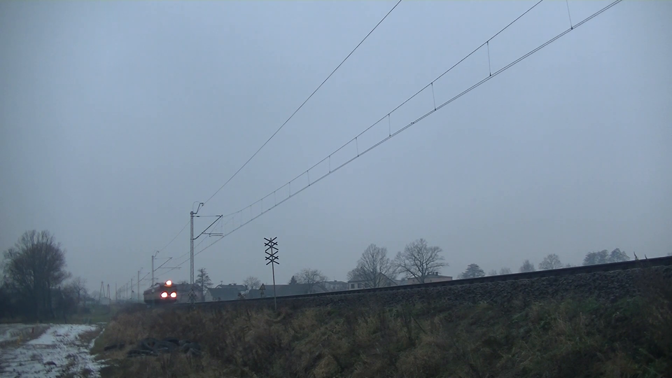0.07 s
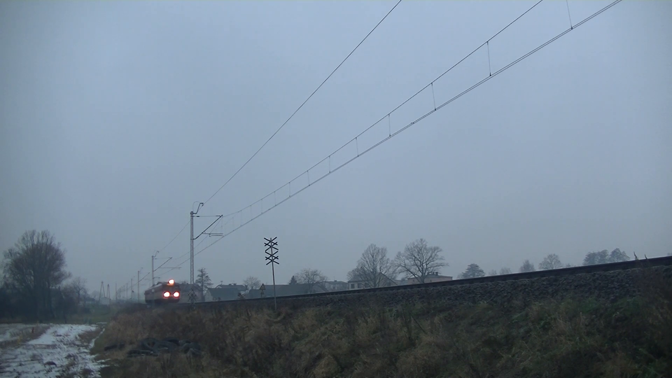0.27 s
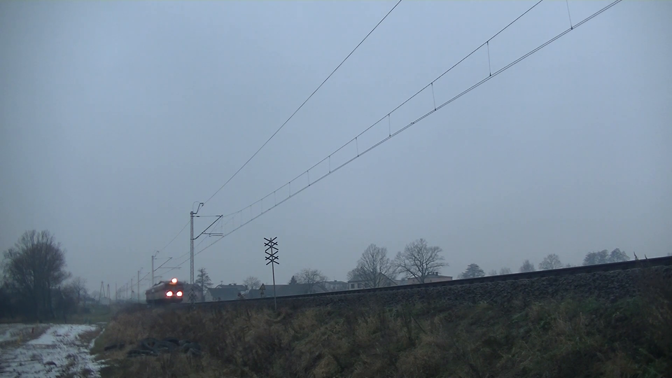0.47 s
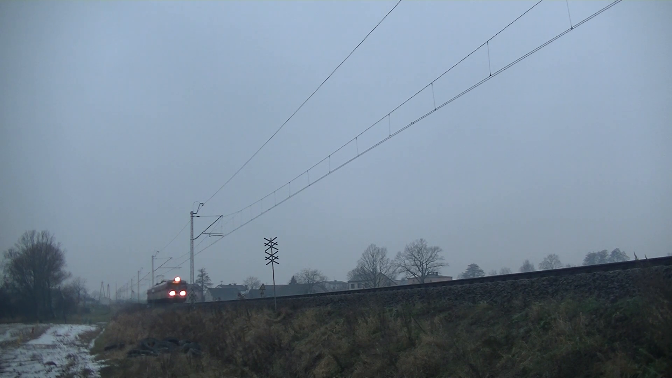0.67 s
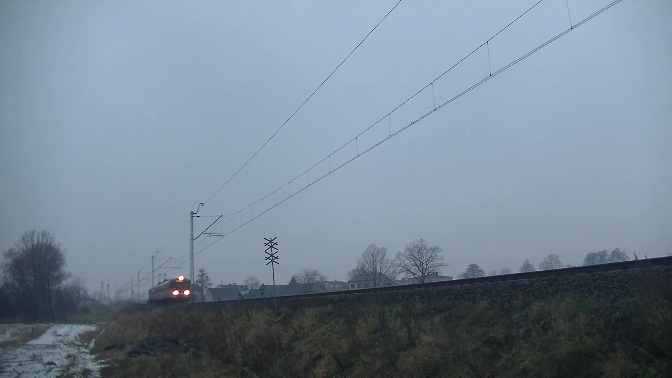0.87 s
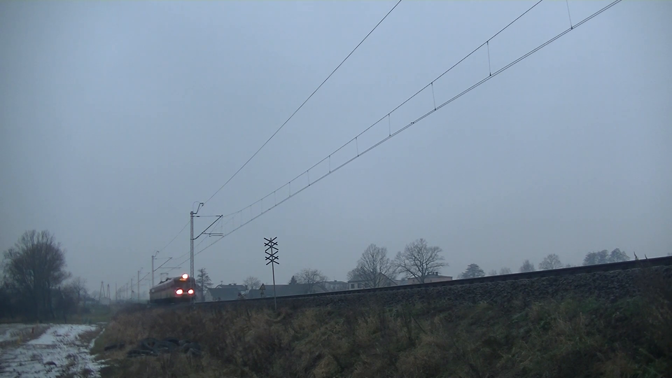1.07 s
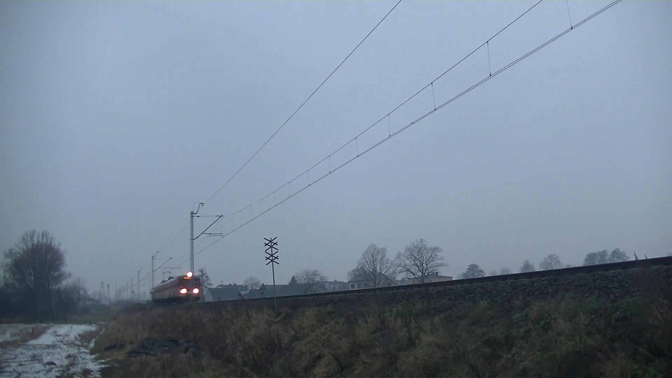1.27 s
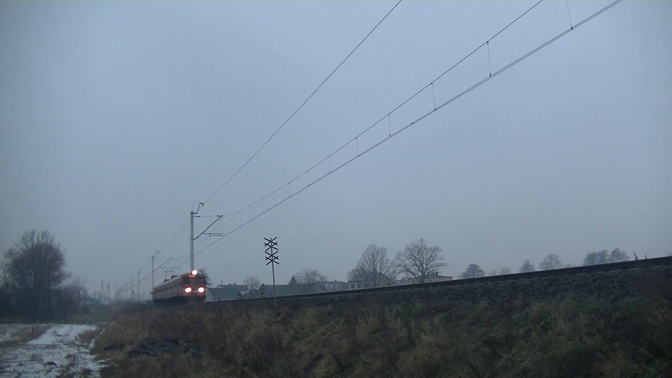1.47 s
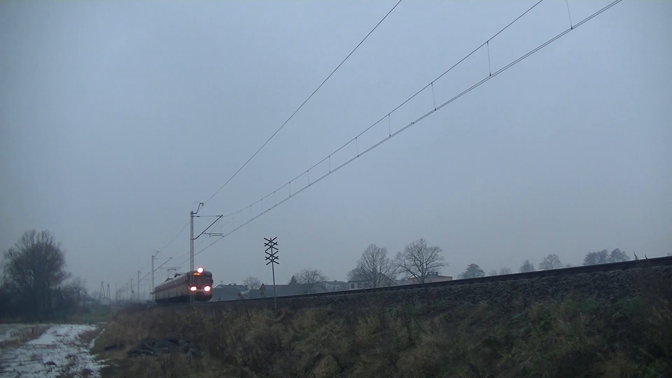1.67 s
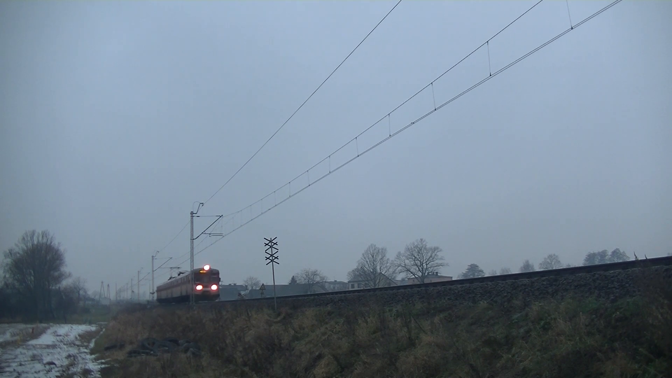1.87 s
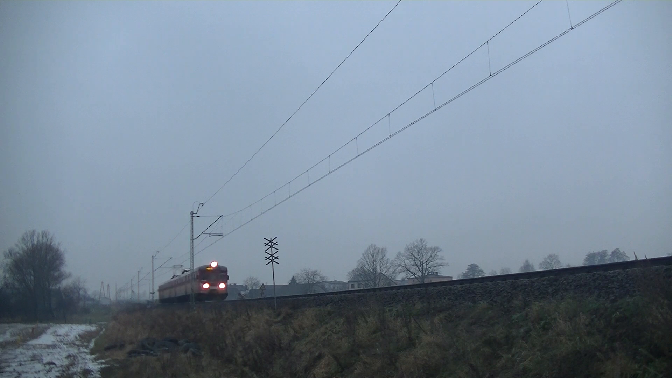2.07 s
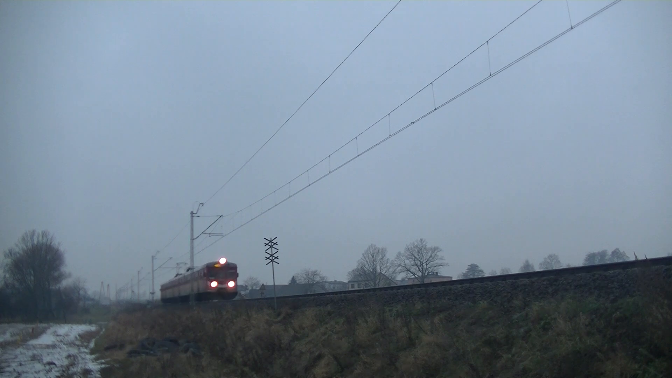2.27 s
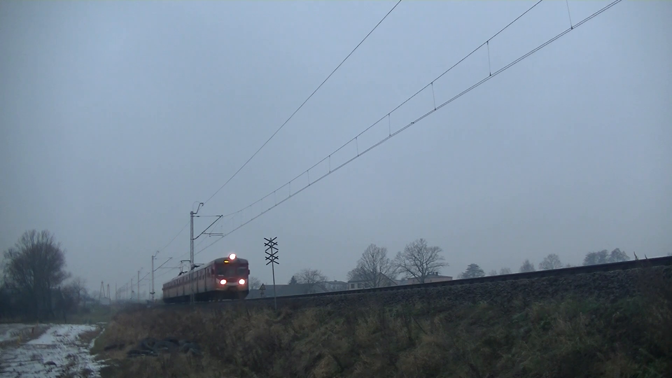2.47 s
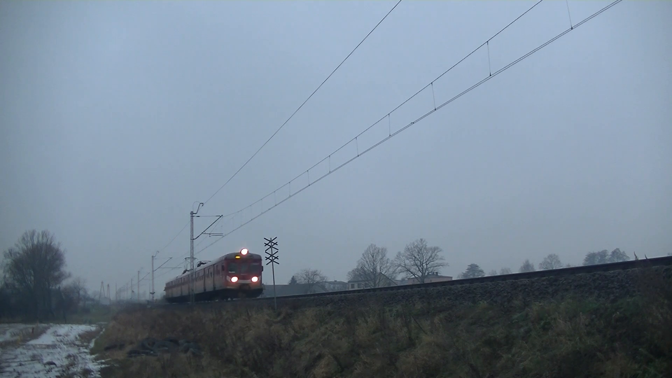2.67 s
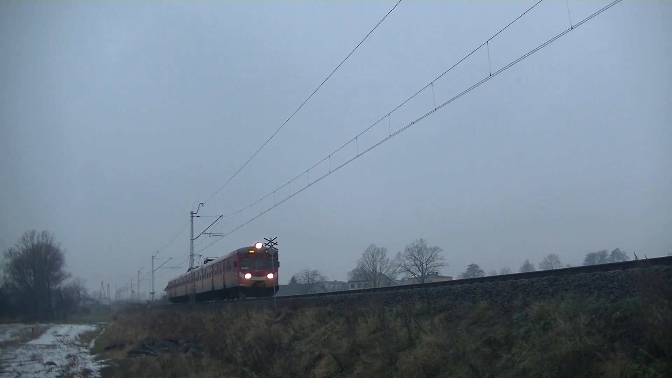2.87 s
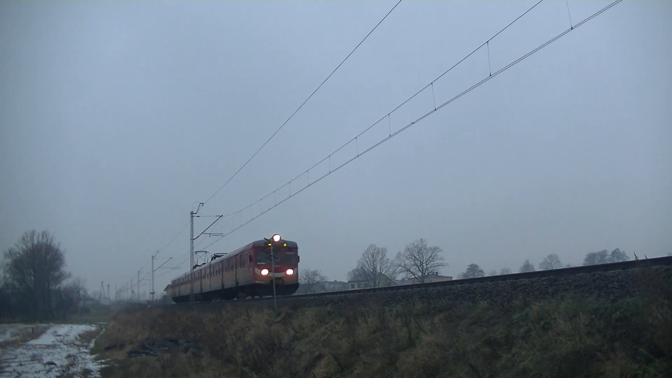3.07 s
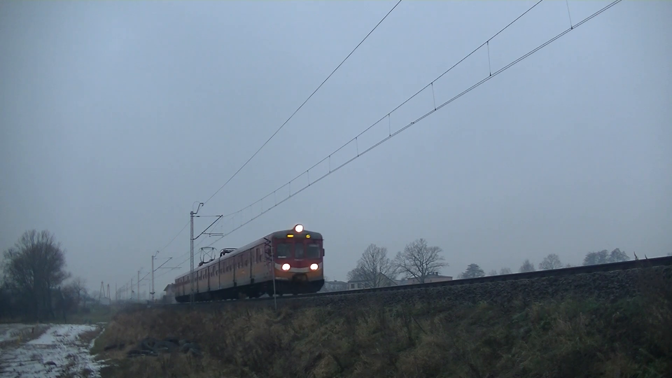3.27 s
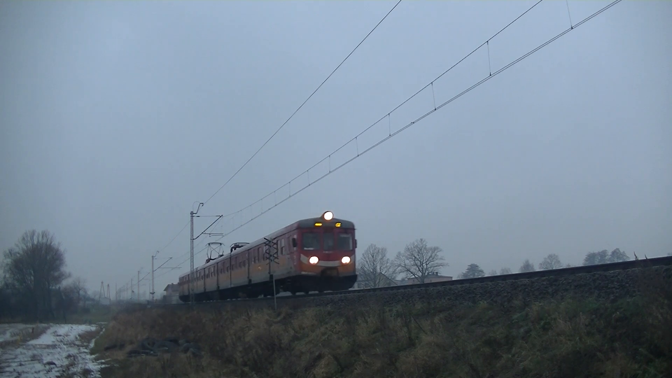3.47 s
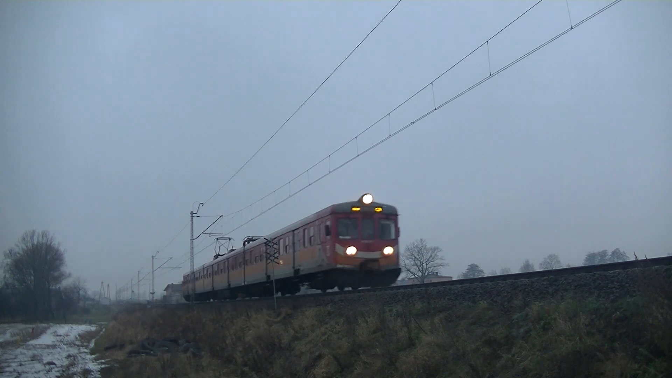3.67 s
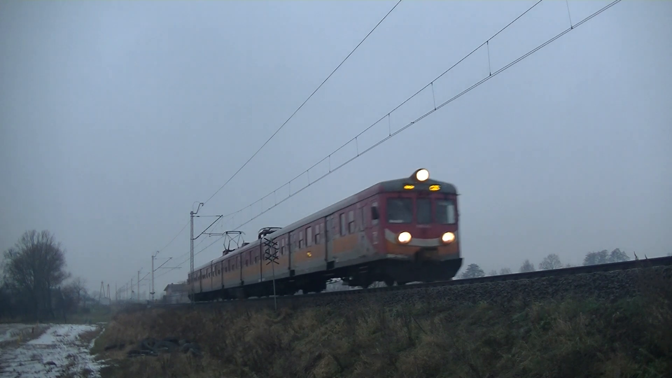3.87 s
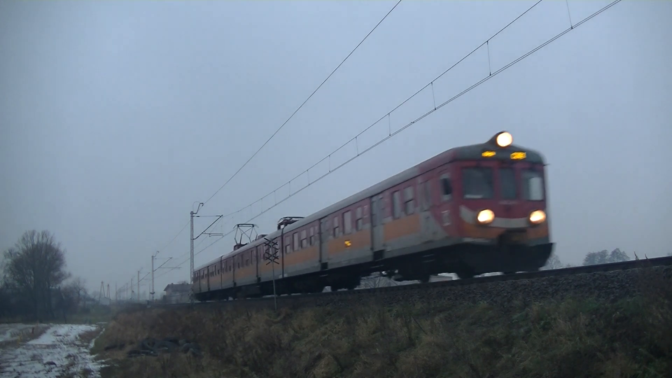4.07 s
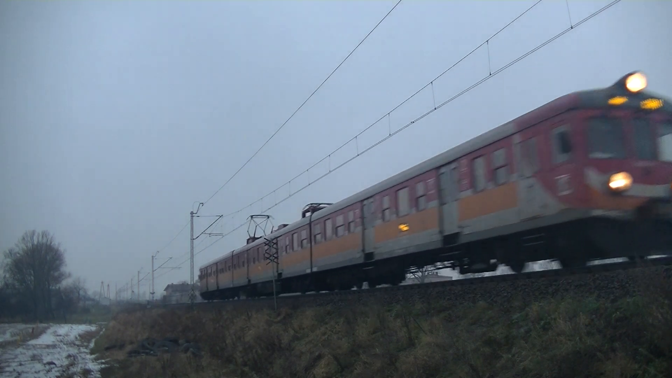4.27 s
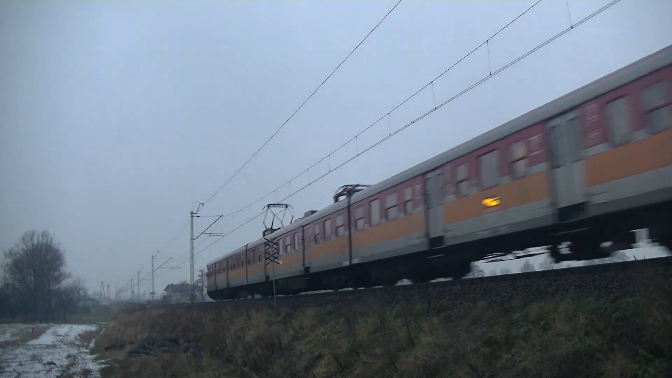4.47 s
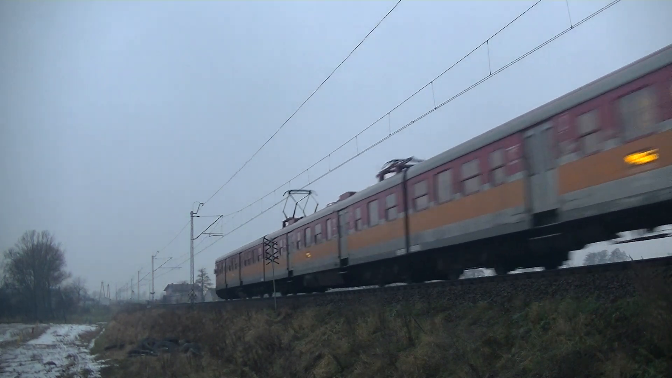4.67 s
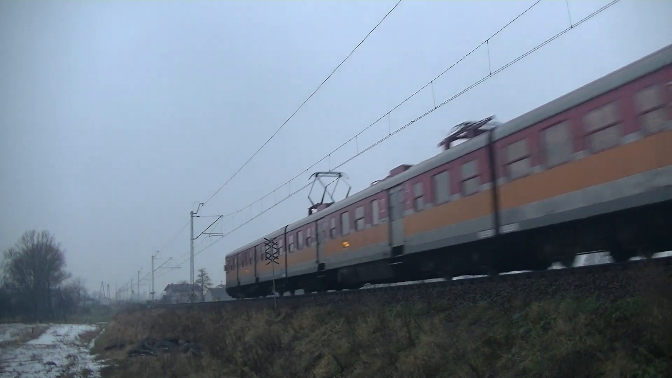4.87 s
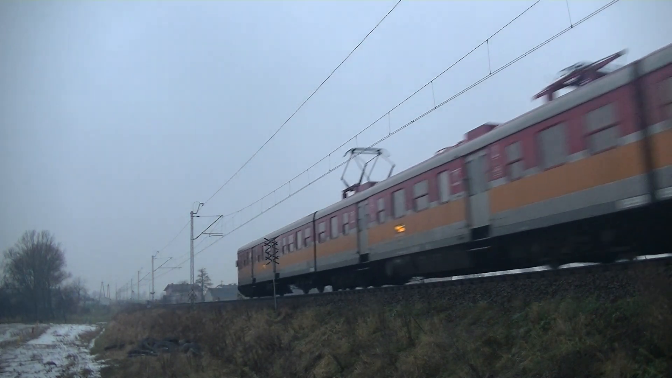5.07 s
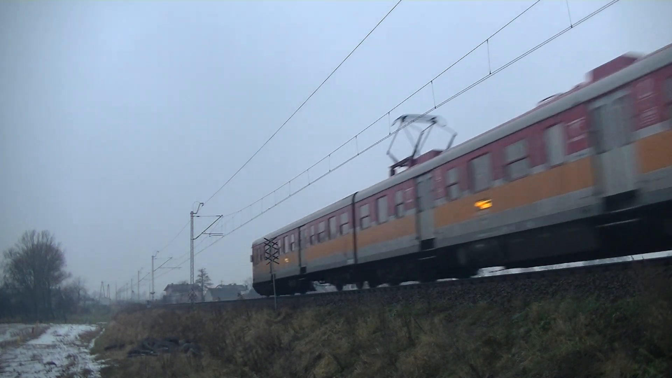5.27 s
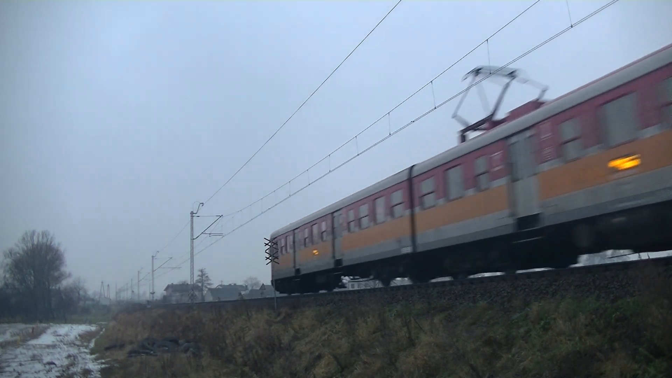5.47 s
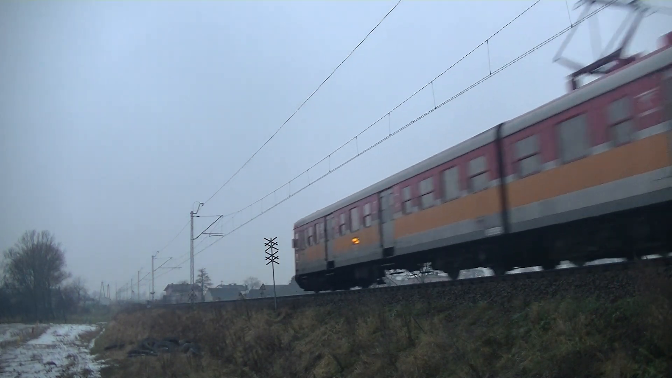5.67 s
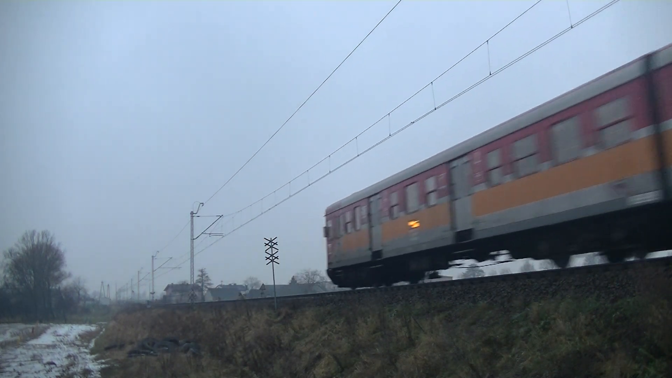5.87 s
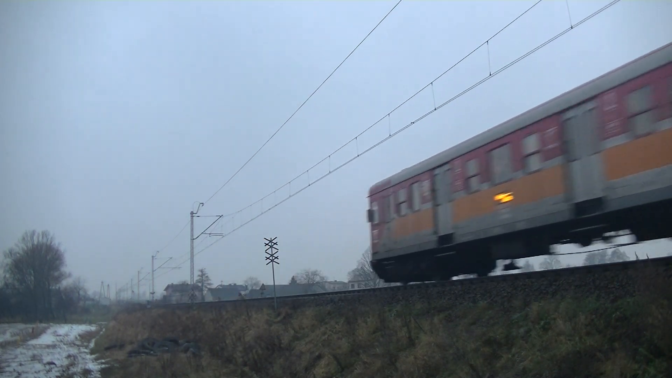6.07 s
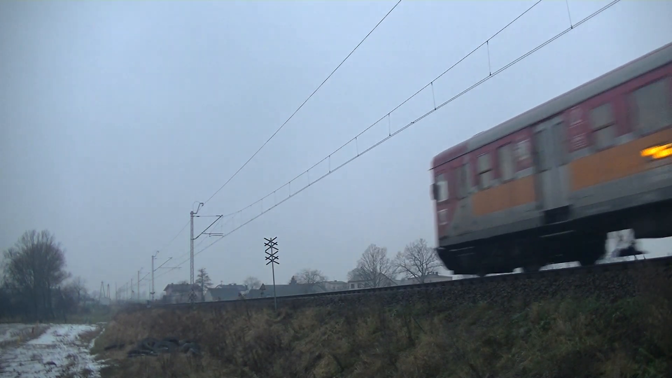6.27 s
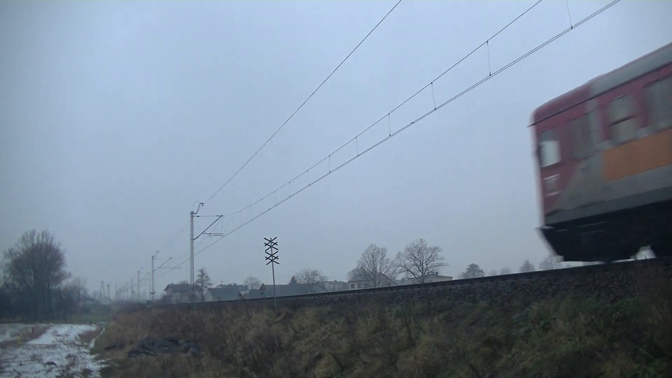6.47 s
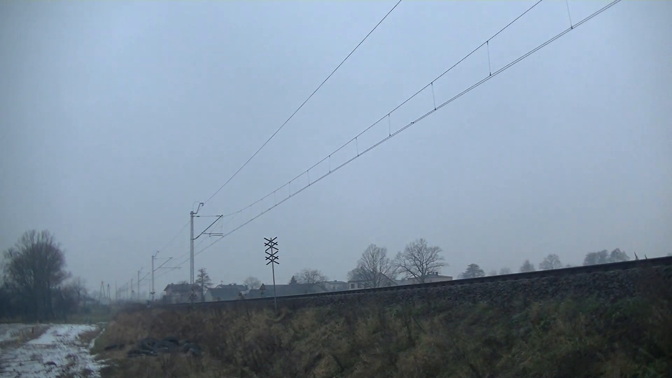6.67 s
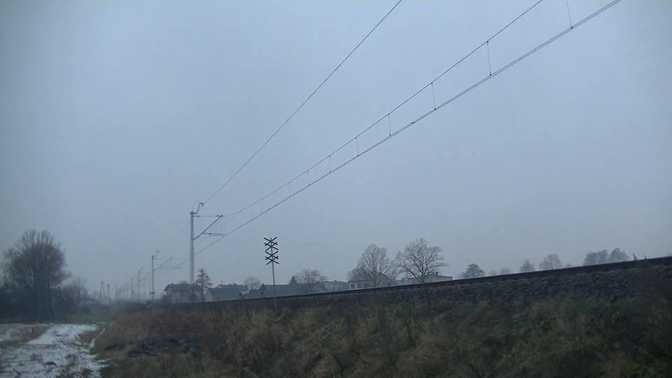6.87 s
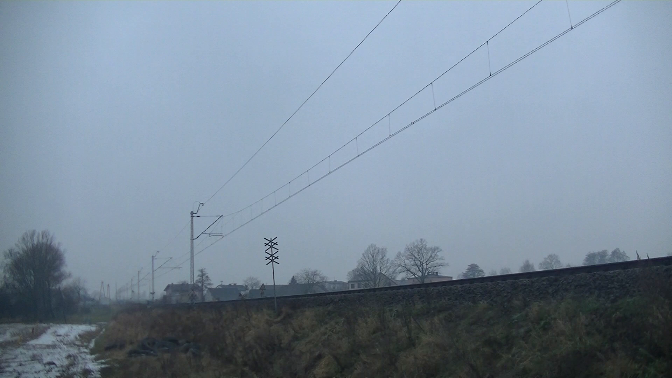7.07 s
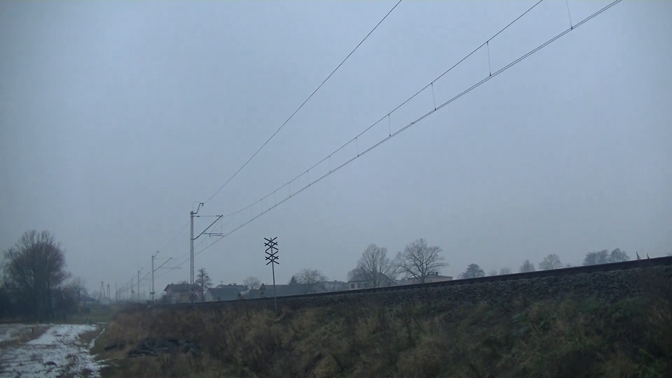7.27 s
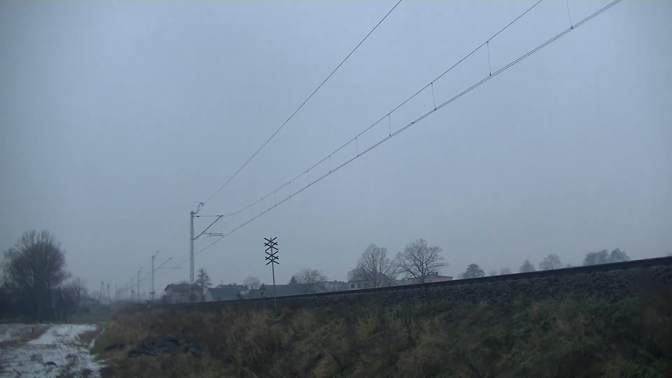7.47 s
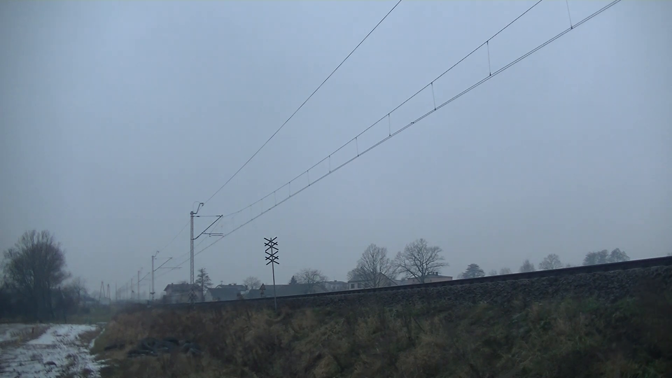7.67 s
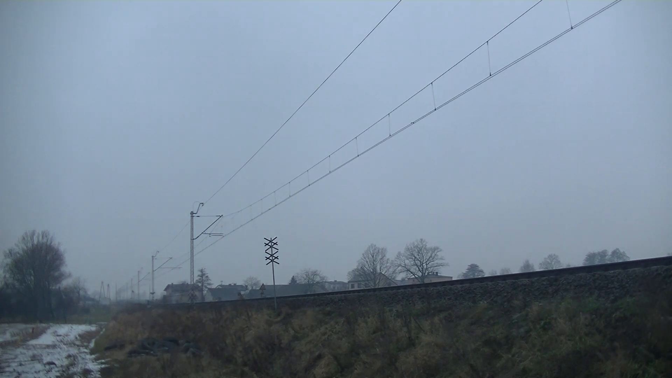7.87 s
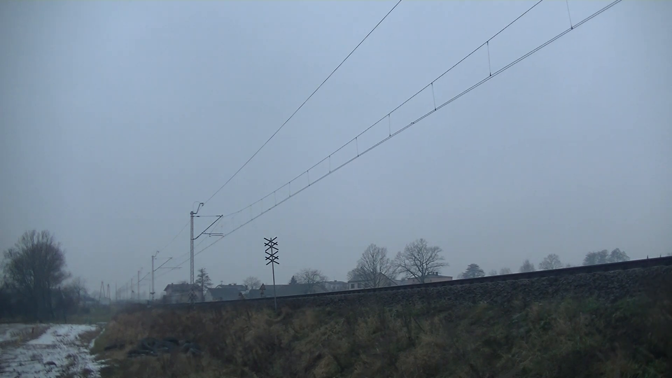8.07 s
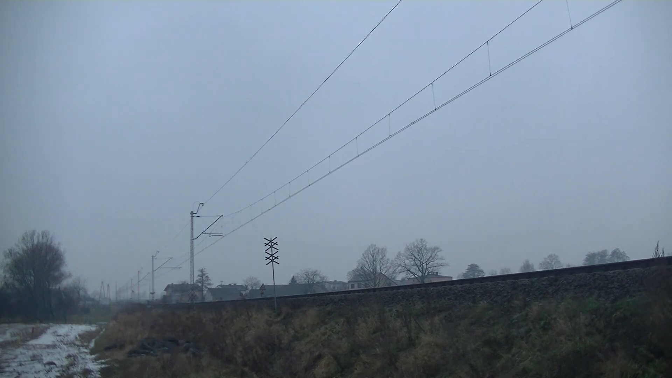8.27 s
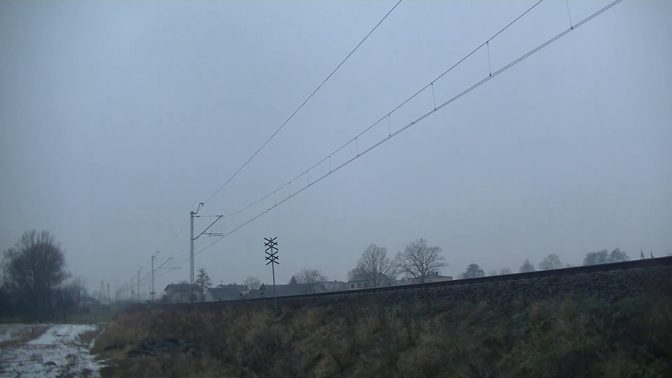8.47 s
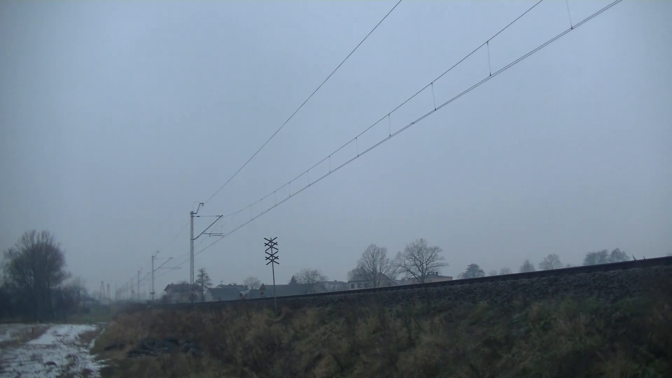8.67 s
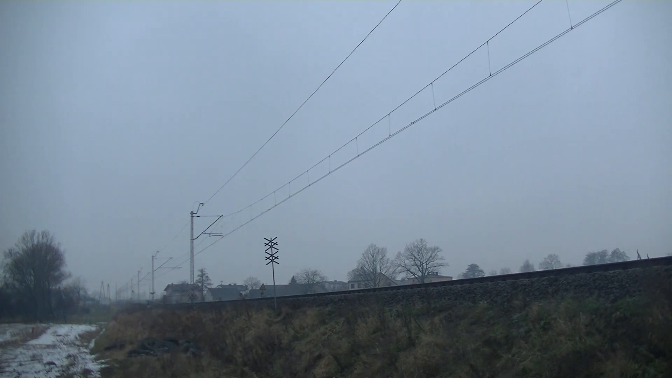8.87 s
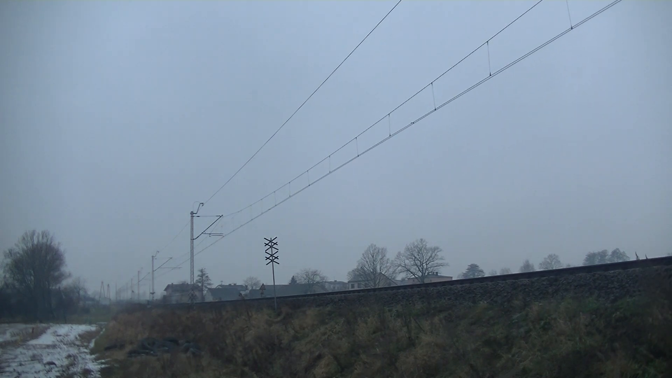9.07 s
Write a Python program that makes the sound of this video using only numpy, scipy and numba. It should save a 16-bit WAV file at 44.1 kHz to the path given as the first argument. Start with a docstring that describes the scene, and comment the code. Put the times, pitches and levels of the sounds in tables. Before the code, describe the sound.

In an open field beside a railway embankment, a stereo microphone picks up an electric passenger train. From 0 to 1.5 s there is only faint, thin wheel hiss, slowly growing over light amplifier noise. Around 1.6 s the rail begins to sing near 1.7 kHz, with short wavering whistles until about 4 s; a tiny soft tick falls at 2.1 s. The hiss thickens from 2.3 s and climbs steeply after 3.5 s. From about 4.2 to 7.1 s the train rushes by as a loud, broad roar of wheels and rails, with modest low rumble, airy hiss, bogie surges near 5, 5.7, 6.4 and 7.2 s, and faint motor tones sagging in pitch. The singing slides lower. Between 7.1 and 7.5 s the roar collapses, leaving a quiet, duller receding rush that fades; a faint distant dull rush enters near 9 s.

```python
"""In a field below a railway embankment, an electric passenger train nears, rushes past and quickly drops away.
Filtered noise makes its roar: car bodies rumble, bogies drone, rails and wheels roar, air hisses round the roof gear.
A stretch of rail sings near 1.7 kHz, from narrow noise and wavering sine whistles; gear tones sag in pitch.
A soft tick is a very short sine, a late dull rush is wide filtered noise, and amplifier hiss lies under it all.
The two microphone ports hear each bearing with their own balance, lead and likeness."""
import sys
import numpy as np
from scipy import signal
from scipy.fft import rfft, irfft, next_fast_len
from scipy.io import wavfile
from scipy.ndimage import uniform_filter1d
from numba import njit

SR = 44100
rng = np.random.default_rng(int(sys.argv[2]) if len(sys.argv) > 2 else 0)


def ratio(d):
    """dB to gain"""
    e = np.asarray(d, float) / 20
    return 10 ** e


def put_to_file(sound):
    """Save the sound as 16-bit audio at rate SR, in the file named by the first command-line argument."""
    columns = np.atleast_2d(sound).T  # one column per channel
    safe = np.clip(columns, -1, 1)
    whole_steps = np.round(safe * 32767)
    wavfile.write(sys.argv[1], SR, whole_steps.astype(np.int16))


N = 402633
TIME = np.arange(N) / SR  # s
SIZE = next_fast_len(N)
HZ = np.maximum(np.arange(SIZE // 2 + 1) * SR / SIZE, 1)
# sign of each port: left, right
SIDE = np.array([[1], [-1]])

# the passing train: (time [s], wheel roar level [dB], lower roar against the wheels [dB])
TRAIN = [(0, -42.5, -7.5), (1.55, -39, -10), (1.9, -36.5, -11), (2.32, -32, -13.5), (2.44, -30.5, -15),
         (3.55, -26, -12.5), (3.85, -22, -15), (4.22, -17, -19.5), (4.45, -16, -19.5), (4.7, -15.5, -18),
         (5.1, -15, -17), (5.45, -15.5, -15), (5.75, -17.5, -15), (6.0, -16.5, -13), (6.4, -17, -15),
         (6.8, -16.5, -15), (7.1, -19.5, -12.5), (7.33, -23.5, -10.5), (7.5, -34, -2.5), (7.7, -35, -4),
         (8.9, -39.5, -6)]
# range of each part, in the order wheels, car bodies, bogies, rails, air: (low edge [Hz], high edge [Hz])
PART_EDGES = [(1490, 5000), (32, 170), (170, 600), (600, 1490), (5000, 16000)]
# tone colour of the train from each bearing; only the shape counts: (frequency [Hz], level [dB])
COLOUR_AHEAD = [(40, -19), (400, -23.5), (500, -17.5), (660, -22.5), (900, -11), (1170, -15), (1400, -10.5),
                (1560, -2), (2600, 1), (3300, -3), (4200, -3.5), (5200, -19.5), (7300, -18), (8600, -35),
                (15600, -47.5)]
COLOUR_BESIDE = [(40, -37), (170, -33.5), (350, -13.5), (620, -15.5), (850, -7), (1300, -8), (1600, -5.5),
                 (3400, -1.5), (4050, 0.5), (4700, -9.5), (7300, -17), (8300, -27), (9800, -29),
                 (11000, -38.5), (15600, -43.5)]
COLOUR_BEHIND = [(60, -19), (210, -6), (370, -5.5), (550, -7), (950, 4), (1400, 3), (1750, 1.5), (2400, 4),
                 (3500, 0.5), (4100, -2.5), (4600, -9), (5500, -10), (7000, -17), (11000, -41.5)]
# how the two ports differ, before the strength and SCATTER below:
# (frequency [Hz], left minus right [dB], left lead [radians], likeness [0-1])
PORTS_AHEAD = [(60, -1.8, -0.2, 0.81), (400, -3.4, 0.2, 0.47), (1500, 0.5, 0.7, 0.88),
               (2600, 3.9, 0.3, 0.75), (3800, -2.2, 0.3, 0.93), (4450, -2.4, 0.2, 0.9),
               (5050, -5.3, 0.9, 0.56), (5450, -5.2, 1.5, 0.25), (6000, 6.0, 0.2, 0.66),
               (7600, 2.6, -0.8, 0.65), (8700, -3.2, -1.5, 0.34), (10200, -2.6, -0.2, 0.29),
               (11200, 1.0, -2.7, 0.5), (15000, -1.6, -2.5, 0.37)]
PORTS_BESIDE = [(60, -0.9, -0.0, 0.97), (400, -5.5, -0.0, 0.99), (1500, -3.3, -0.1, 0.87),
                (2600, -7.2, -0.5, 0.73), (3800, -3.4, -0.2, 0.95), (4450, -0.8, -0.4, 0.84),
                (5050, -5.9, -1.5, 0.52), (5450, -8.2, -0.6, 0.36), (6000, -4.6, -0.5, 0.59),
                (7600, -1.0, -1.4, 0.65), (8700, -7.6, -1.5, 0.53), (10200, -1.7, -0.1, 0.71),
                (11200, 0.8, -2.4, 0.3), (15000, -2.1, -2.7, 0.34)]
PORTS_BEHIND = [(60, -1.3, -0.2, 0.88), (400, -4.8, 0.0, 0.92), (1500, -0.3, 0.2, 0.81),
                (2600, 1.6, -1.9, 0.4), (3800, -0.9, -2.0, 0.36), (4450, 1.3, -2.8, 0.44),
                (5050, -5.4, -3.2, 0.68), (5450, -6.4, -3.2, 0.62), (6000, -7.5, -3.2, 0.2),
                (7600, -4.4, -2.3, 0.19), (8700, -3.7, -0.6, 0.28), (10200, -0.2, -0.3, 0.27),
                (11200, 0.1, -2.9, 0.19), (15000, -2.3, -1.0, 0.14)]
# narrow hissing bands from the front of the train: (frequency [Hz], width [Hz], level over the roar [dB])
HISSING_BANDS = [(2300, 250, 3), (4000, 300, 3), (5620, 110, 10), (9500, 110, 12), (13050, 80, 8)]
# the singing rail: (time [s], pitch [Hz], husky tone against the wheels [dB])
SONG = [(1.6, 1720, -15), (3.0, 1688, -17.5), (4.0, 1662, -20), (4.6, 1660, -13), (5.3, 1585, -28),
        (6.0, 1560, -14), (6.9, 1445, -30), (7.35, 1385, -18)]
# clear whistles of the rail: (start [s], length [s], peak against the wheels, before wavering [dB])
WHISTLES = [(1.57, .38, 0), (2.0, .1, -3), (2.26, .24, -3), (2.9, .19, -4), (3.2, .26, -5), (3.48, .1, -6),
            (3.9, .18, -9)]
# motor and gear drone of driven bogies, before the left-right balance:
# (start [s], length [s], pitch at the start [Hz], sag [Hz per s], peak level [dB])
DRONES = [(4.1, .8, 290, 30, -51), (4.55, .3, 390, 40, -40), (4.55, .3, 785, 130, -37),
          (5.2, .5, 290, 80, -47), (5.85, .45, 350, 40, -42), (5.9, .55, 260, 55, -47),
          (7.22, .22, 735, 380, -35), (7.25, .15, 850, 500, -36)]
# soft tick near the microphones: (time [s], level before the fade [dB], pitch [Hz], fade to 1/e [s])
TICK = (2.077, -25, 1200, .0007)
# dull rush from far off: (start [s], level [dB], centre [Hz], width [Hz])
RUSH = (8.958, -38.5, 1000., 1500.)
# amplifier hiss, as white noise of that level: (frequency [Hz], level [dB])
HISS = [(100, -85), (300, -70), (1000, -64), (12000, -62.5), (15600, -65)]
# deep rumble of the car bodies: (time [s], level [dB])
RUMBLE = [(0.05, -72), (0.22, -76), (2.9, -72.5), (4.11, -58.5), (4.86, -63.5), (5.79, -55), (6.37, -61),
          (7.26, -58.5), (9.1, -74)]
# bogies against the lower roar, then air against the wheels:
# (ahead [dB], slanting [dB], square to the right [dB], behind [dB])
PART_LEVELS = [(-15, -9.5, -8.5, -10), (-13, -14, -12, -3.5)]
# bogie groups square to the right: (time [s], pull on the bearing [bearing steps])
BOGIES = [(4.95, 0.33), (5.68, 1.2), (6.4, .8), (7.2, 1.24)]
# extra swell of the bogie drone that lingers: (peak time [s], extra [dB], rise to 1/e [s], fall to 1/e [s])
LINGER = (7.24, 4, 0.4, 0.42)
# spread of the quick wavering of each part, in the order of PART_EDGES: (level [dB])
FLICKER = [0.54, 0.4, 0.79, 0.35, 0.86]

FLICKER_RATE = 9  # new levels per s
SCATTER = 0.55  # power on the likeness; under 1 makes the ports more alike
# air hiss lost per nearest distance, ahead and behind [dB]; wheel level at the nearest distance [dB]
AIR_LOSS_DB, NEAREST_DB = (0.18, 0.75), -15
# bearing 0 is ahead, 1 slanting past, 2 square to the right, 3 behind
CREEP_PER_S = 0.076
SWING_S, BEHIND_S = (3.4, 4.65), (7.36, 7.52)  # front swings in, tail slips behind (from, to)
PULL_S = 0.48  # reach of each bogie's pull, either side
SONG_WIDTH_HZ = 230.0  # of each of two filters in a row
DRONE_WIDTH = 0.1  # of each of two filters in a row, as a share of the starting pitch


def along_hz(table):
    """Read the columns of a table on a log-frequency axis."""
    hz, *columns = np.transpose(table)
    return [np.interp(np.log(HZ), np.log(hz), column) for column in columns]


def along_time(table):
    """Read the columns of a table at every sample."""
    s, *columns = np.transpose(table)
    return [np.interp(TIME, s, column) for column in columns]


def ramp(span):
    """Rise evenly from 0 to 1 between two times."""
    start, end = span
    return np.clip((TIME - start) / (end - start), 0, 1)


def walk(rate):
    """Wander at random: levels held for 1 / rate s, smoothed twice, with a spread near 1."""
    hold = int(SR / rate)
    steps = np.repeat(rng.standard_normal(N // hold + 1), hold)
    return 1.09 * uniform_filter1d(uniform_filter1d(steps, hold), hold)[:N]


def noise_spectra():
    """Draw white noise spectra: one shared wave, then one for each port."""
    return rfft(rng.standard_normal((3, SIZE)))


def to_sound(spectrum):
    """Turn a spectrum into sound of the scene's length."""
    return irfft(spectrum, SIZE)[:, :N]


@njit
def band_pass(x, hz, width):
    """A resonance with a moving centre (state-variable filter), gain 1 at the centre."""
    y, band, low = np.empty(len(x)), 0.0, 0.0
    for i in range(len(x)):
        g = np.tan(np.pi * hz[i] / SR)
        damping = width / hz[i]
        v = (band + g * (x[i] - low)) / (1 + g * (g + damping))
        band = 2 * v - band
        low = low + 2 * g * v
        y[i] = damping * v
    return y


def at_ports(ports, noise, strength=1):
    """Each port hears a shared wave, with its own balance and lead, plus scatter of its own."""
    balance_db, lead, like = along_hz(ports)
    like = np.clip(like, 0, 1) ** SCATTER
    side = strength * SIDE
    gain = ratio(side * balance_db / 2)
    turn = np.exp(1j * side * lead / 2)
    shared = np.sqrt(like) * turn * noise[0]
    scatter = np.sqrt(1 - like) * noise[1:]
    # power of the left-right average, divided out so that the centre keeps an even spectrum
    centre = like * abs((gain * turn).mean(0)) ** 2 + (1 - like) * (gain ** 2).sum(0) / 4
    return gain * (shared + scatter) / np.sqrt(centre)


def unit(x):
    """Scale a pair so that its left-right average has rms 1."""
    return x / np.sqrt(np.mean(x.mean(0) ** 2))


def shares():
    """The train's bearing slides round, and each moment blends the two nearest of four bearings."""
    bearing = np.minimum(CREEP_PER_S * TIME + ramp(SWING_S), 1)
    bearing = bearing + sum(pull * np.clip(1 - abs(TIME - s) / PULL_S, 0, 1) for s, pull in BOGIES)
    bearing = np.clip(bearing + (3 - bearing) * ramp(BEHIND_S), 0, 3)
    return [np.clip(1 - abs(bearing - k), 0, 1) for k in range(4)]


def part_levels(share):
    """Bogies and rails follow the lower roar; the air hiss loses level with distance."""
    wheels_db, lower_db = along_time(TRAIN)
    bogies, air = np.array(PART_LEVELS) @ np.array(share)
    # a quieter wheel roar means a greater distance
    distance = ratio(NEAREST_DB - wheels_db)
    far_db = distance * (AIR_LOSS_DB[0] * share[0] + AIR_LOSS_DB[1] * share[3])
    rails_db = wheels_db + lower_db
    s, extra_db, rise, fall = LINGER
    bogies = bogies + extra_db * np.exp(-((TIME - s) / np.where(TIME < s, rise, fall)) ** 2)
    return wheels_db, along_time(RUMBLE)[0], rails_db + bogies, rails_db, wheels_db + air - far_db


def roar(arrivals):
    """Each part of the train is noise in its own range, coloured by bearing, with a flickering level."""
    hissing = 1 + sum((ratio(db) - 1) / (1 + (2 * (HZ - hz) / width) ** 2) for hz, width, db in HISSING_BANDS)
    ahead, beside, behind = [ratio(along_hz(t)[0]) for t in (COLOUR_AHEAD, COLOUR_BESIDE, COLOUR_BEHIND)]
    colours = [hissing * ahead, beside, beside, behind]
    out, share = 0, shares()
    for (low, high), db, flicker_db in zip(PART_EDGES, part_levels(share), FLICKER):
        # soft edges, so that neighbouring ranges blend
        band = np.sqrt(1 / (1 + (low / HZ) ** 24) / (1 + (HZ / high) ** 24))
        part = 0
        for portion, arrival, colour in zip(share, arrivals, colours):
            part = part + portion * unit(to_sound(arrival * colour * band))
        out = out + part * ratio(db + flicker_db * walk(FLICKER_RATE))
    return out


def amplifier_hiss():
    """Microphone amplifiers add steady noise, separate at left and right."""
    return to_sound(rfft(rng.standard_normal((2, SIZE))) * ratio(along_hz(HISS)[0]))


def singing_rail():
    """Roughness, as noise, drives a rail resonance into a husky tone; wavering sines add clear whistles."""
    hz, db = along_time(SONG)
    noise = noise_spectra()
    ports = (PORTS_AHEAD, PORTS_BESIDE, PORTS_BESIDE)  # silent from behind
    drive = sum(portion * to_sound(at_ports(p, noise)) for portion, p in zip(shares(), ports))
    once = [band_pass(x, hz, SONG_WIDTH_HZ) for x in drive]
    husky = unit(np.array([band_pass(x, hz, SONG_WIDTH_HZ) for x in once]))
    # quick and slow wavering of the pitch, in Hz
    phase = 2 * np.pi * np.cumsum(hz + 14 * walk(40) + 10 * walk(6)) / SR
    # the whistle is a little stronger and earlier at the left
    clear = ratio(0.95 * SIDE + 2.5 * walk(30)) * np.sin(phase + 0.4 * SIDE)
    swell = 0
    for start, length, peak_db in WHISTLES:
        progress = np.clip((TIME - start) / length, 0, 1)
        swell = swell + ratio(peak_db) * np.sqrt(abs(np.sin(np.pi * progress)))
    sounding = (TIME > SONG[0][0]) & (TIME < SONG[-1][0])
    on = uniform_filter1d(1.0 * sounding, SR // 5)  # fades over 0.2 s
    return ratio(along_time(TRAIN)[0]) * (on * ratio(db) * husky + swell * clear)


def tick():
    """One soft knock: a sine inside a very short bell-shaped swell."""
    s, db, hz, fade = TICK
    return ratio(db) * np.sin(2 * np.pi * hz * (TIME - s)) * np.exp(-((TIME - s) / fade) ** 2)


def drone(balance_db):
    """Gear tones are narrow noise that swells and fades while its pitch sags."""
    out, noise = np.zeros(N), rng.standard_normal(N)
    for start, length, hz, sag, db in DRONES:
        span = slice(int(start * SR), int((start + length) * SR))
        age = TIME[span] - start
        pitch, width = hz - sag * age, DRONE_WIDTH * hz
        tone = band_pass(band_pass(noise[span], pitch, width), pitch, width)
        swell = np.sqrt(abs(np.sin(np.pi * age / length)))
        out[span] += ratio(db) * swell * tone / tone.std()
    return out * ratio(SIDE * balance_db / 2)


def rush():
    """Wide filtered noise sets in quickly and holds to the end."""
    s, db, hz, width = RUSH
    band = 1 / (1 + ((HZ ** 2 - hz ** 2) / (HZ * width)) ** 2)
    noise = to_sound(band * at_ports(PORTS_BEHIND, noise_spectra()))
    return ratio(db) * unit(noise) * np.clip((TIME - s) / 0.015, 0, 1)  # 15 ms onset


def scene():
    """Add up the train from its four bearings, the rail's song, the gear drone, the tick and the rush."""
    noise = noise_spectra()
    # a bogie square to the side pulls the sound further over than the train as a whole
    arrivals = [at_ports(PORTS_AHEAD, noise), at_ports(PORTS_BESIDE, noise, 0.73),
                at_ports(PORTS_BESIDE, noise, 1.34), at_ports(PORTS_BEHIND, noise)]
    return roar(arrivals) + singing_rail() + tick() + drone(balance_db=-4.5) + rush()


def top_cut(x):
    """Nothing passes above the cut-off."""
    return signal.sosfilt(signal.butter(12, 15820, fs=SR, output="sos"), x)


def record(dry):
    """The amplifiers add their hiss and round off the very loudest peaks."""
    loud = dry + amplifier_hiss()
    mix = loud / (1 + loud ** 6) ** (1 / 6)
    return top_cut(mix)


dry = scene()
out = record(dry)
put_to_file(out)
```